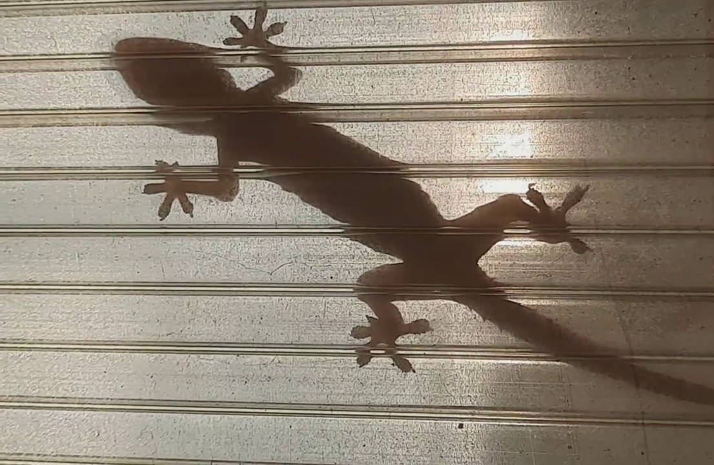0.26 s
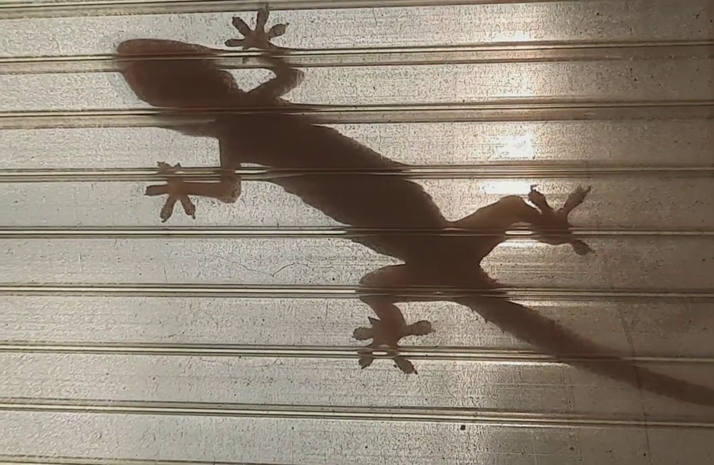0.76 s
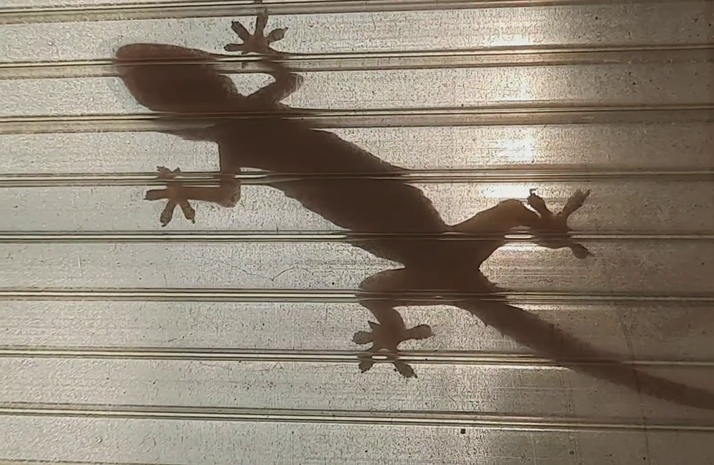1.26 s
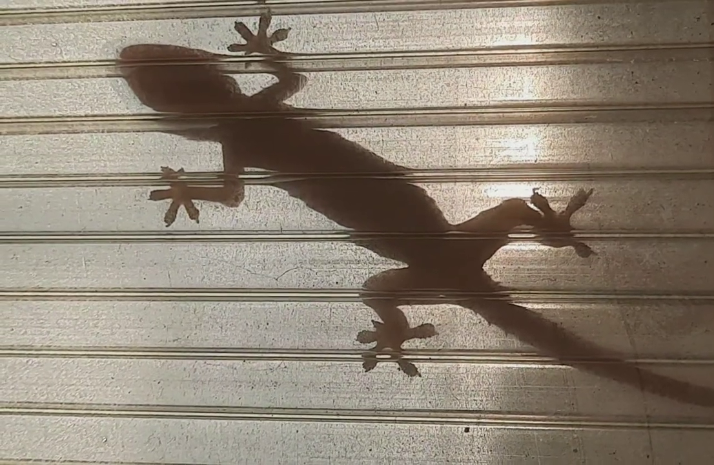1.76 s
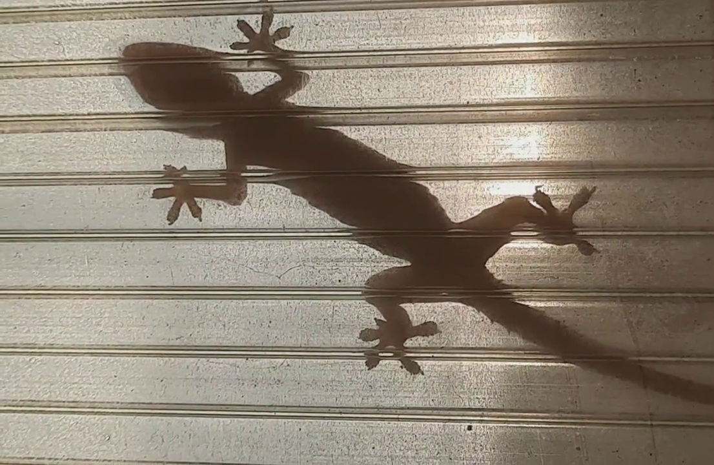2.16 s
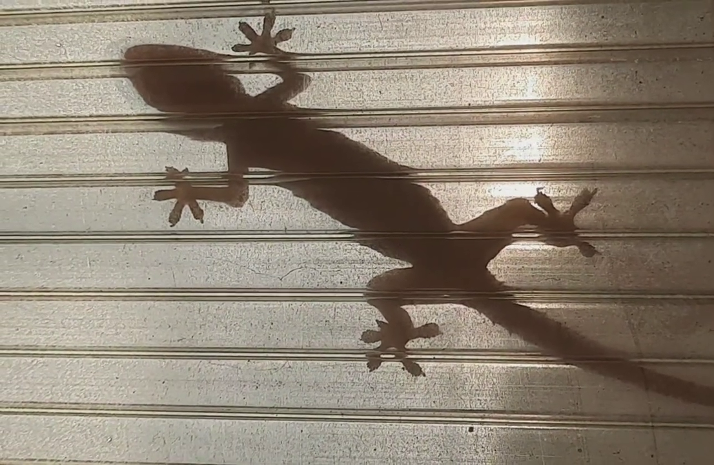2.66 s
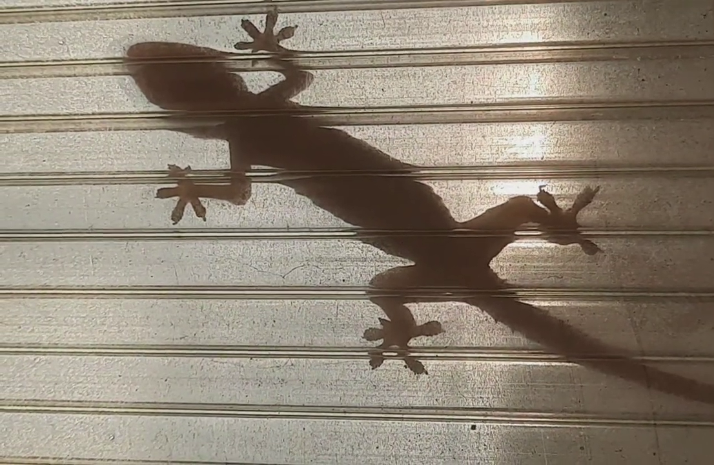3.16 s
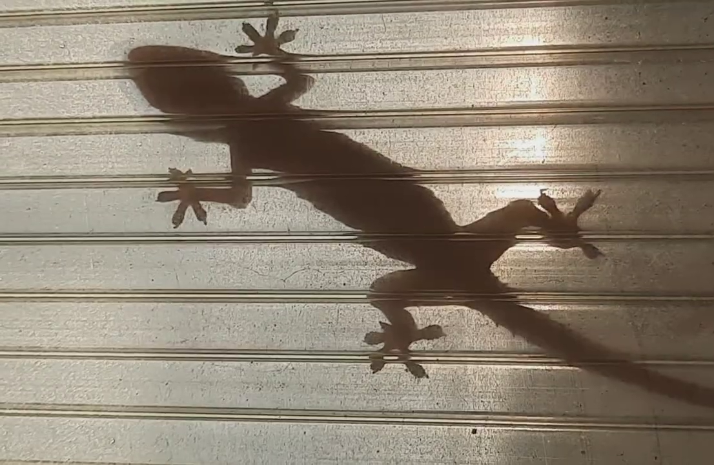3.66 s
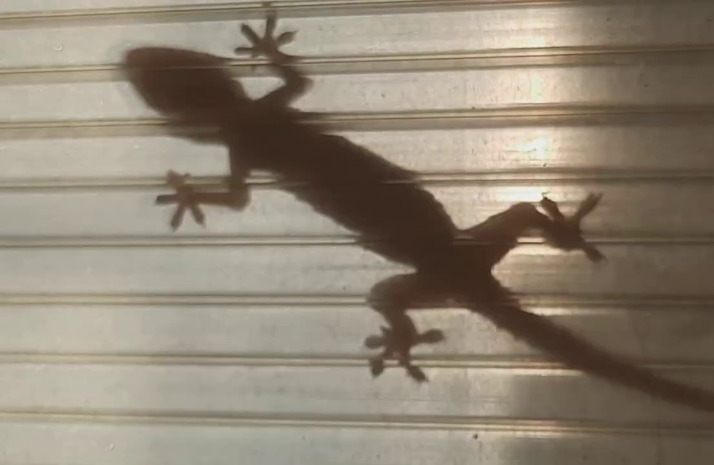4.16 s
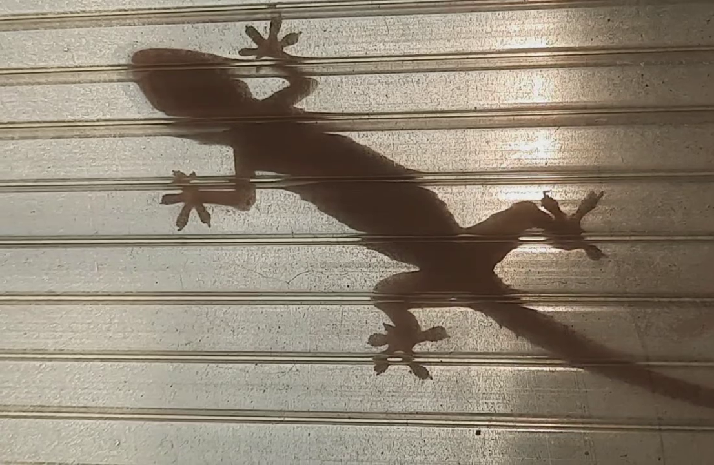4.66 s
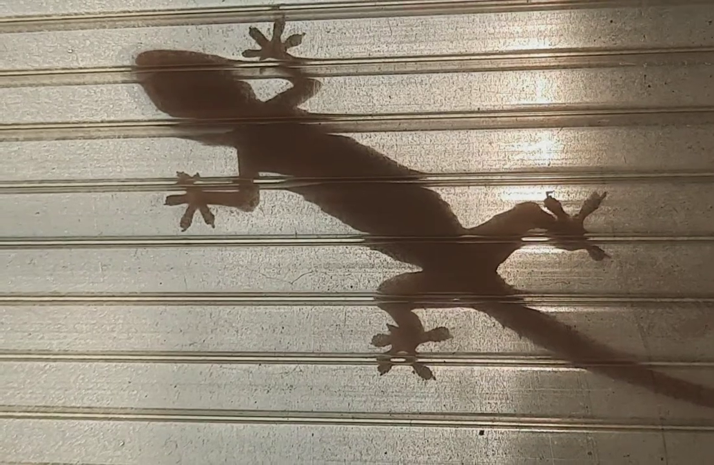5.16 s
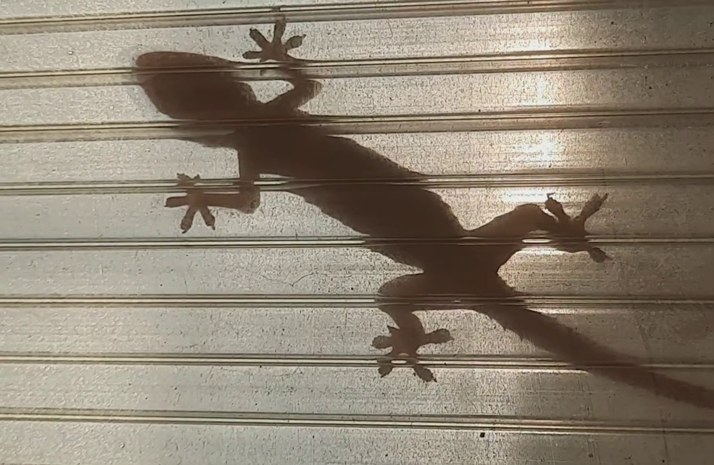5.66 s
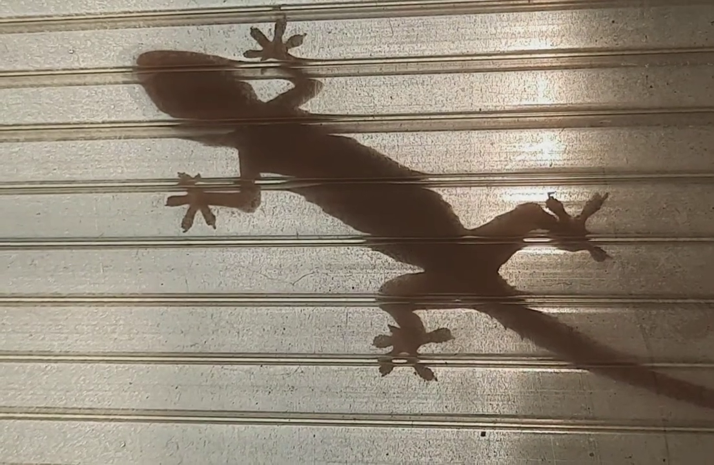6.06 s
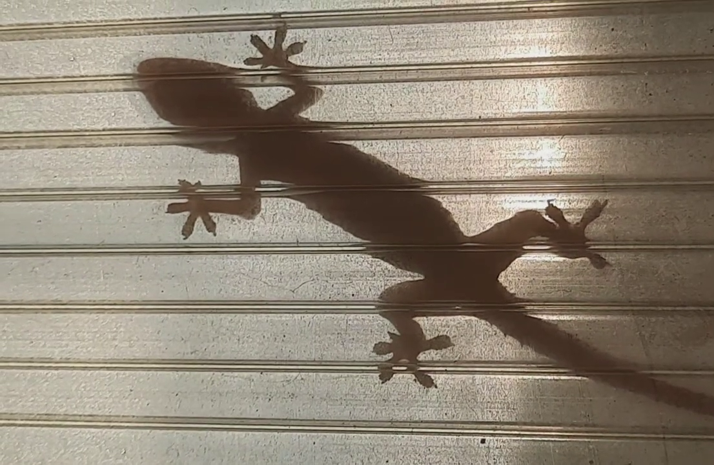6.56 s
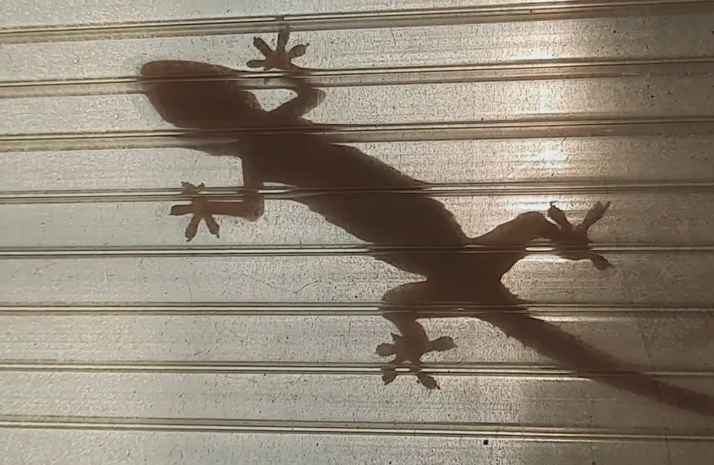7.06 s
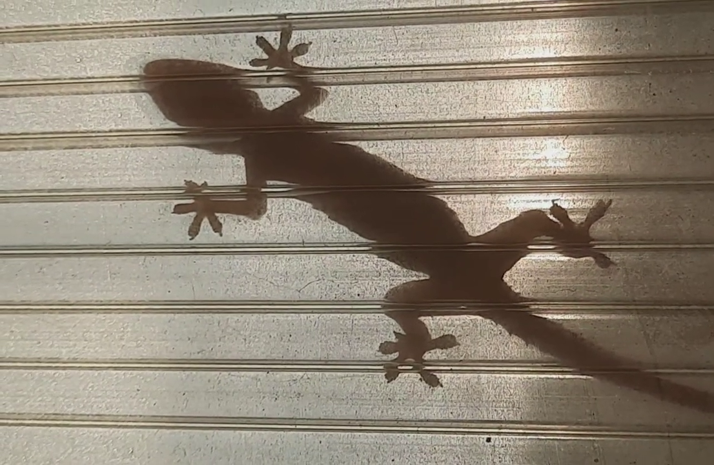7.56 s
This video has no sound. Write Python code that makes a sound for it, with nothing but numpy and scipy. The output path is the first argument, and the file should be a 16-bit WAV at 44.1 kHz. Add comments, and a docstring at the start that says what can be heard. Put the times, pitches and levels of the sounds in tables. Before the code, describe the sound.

Four high, squeaky two-part gecko calls sound close by indoors, with a low mains hum filling the pauses.

```python
"""A house gecko on a plastic roof panel gives four double chirps in a quiet room.
Each call is a short yelp that sinks into a creak, then a louder arched chirp, hoarse at first, then pure.
Both are trains of glottal pulses ringing in the throat; close echoes off the panel make the gliding
tone swell and dip. Under it lies a bed of mains hum, a distant motor, room air, a thin electrical
whine and three faint rustles."""
import sys
import numpy as np
from scipy import signal
from scipy.fft import rfft, irfft
from scipy.io import wavfile

SR = 44100
rng = np.random.default_rng(int(sys.argv[2]) if len(sys.argv) > 2 else 0)


def store_wav(level_fs):
    """Save 16-bit WAV to argv[1]."""
    pcm = np.round(np.clip(np.atleast_2d(level_fs), -1, 1) * 32767)
    wavfile.write(sys.argv[1], SR, pcm.T.astype(np.int16))


N = 344862

# odd harmonics of the mains: harmonic_number, rms_db
HUM_HARMONICS = [(1, -34.2), (3, -77.5), (5, -77), (9, -71.5), (11, -79.5), (19, -88)]
# drone of a distant motor: centre_hz, width_hz, rms_db
MOTOR_BANDS = [(253.4, 40, -64), (466, 6.9, -75), (666, 4, -83.5)]
# colour of the room air and hiss: frequency_hz, relative_db
AIR_COLOUR = [(20, 2), (45, 3), (115, 1.5), (165, -4), (240, -7), (330, -13.5), (520, -14), (690, -12),
              (780, -19), (1300, -21), (2500, -25.5), (6000, -28), (15500, -29.5)]
# path of the electrical whine: time_s, centre_hz
WHINE_PATH = [(0, 6700), (1.1, 6650), (1.6, 6770), (2.8, 6810), (3.3, 6720), (4.6, 6770), (5.6, 6680),
              (6.301, 6750), (7.2, 6650)]
# faint rustles: peak_s, half_length_s, centre_hz, peak_rms_db
RUSTLE_PUFFS = [(4.227, 0.0046, 12000, -65), (5.599, 0.0045, 4560, -65.5), (5.923, 0.021, 3494, -66.5)]
# close echoes between the ribs of the panel: delay_ms, signed_gain
RIB_ECHOES = [(0.850, .12), (1.288, .22), (1.415, -.23), (1.650, -.24)]
# EQ on the sound that the panel's frame scatters: frequency_hz, gain_db
SPLASH_EQ = [(1500, 1.5), (2500, 4.5), (3600, 7.5), (4700, -4.5), (5500, -0.5), (7000, 8), (11000, 2.5)]
# throat resonances, mouth half closed: frequency_hz, relative_db
NARROW_THROAT = [(700, -50.5), (1200, -22), (1700, -25), (2200, -13.5), (2500, -15), (2720, -9.5),
                 (2950, -13.5), (3300, -11.5), (3900, -10.5), (4500, -1), (5250, -8), (5750, -19),
                 (7000, -32.5), (8200, -36.5), (10500, -60), (13500, -67)]
# throat resonances, mouth open: frequency_hz, relative_db
OPEN_THROAT = [(700, -50.5), (1200, -27), (1750, -23), (2300, -21.5), (2700, -14), (3300, -16), (3900, -9),
               (4500, 0.5), (5250, 2), (5900, -11.5), (7000, -29), (8200, -32), (10500, -47), (13500, -67)]
# first syllables: start_s, top_hz, rise_s, fall_s, creak_s, pulse_db
YELP_CUES = [(0.0001, 2363, .0066, 0.011, 0.017, -23.5), (2.429, 2540, .011, .015, 0.024, -24.5),
             (4.9035, 2406, 0.0058, .017, 0.026, -23.5), (7.3383, 2731, .0032, 0.017, 0.026, -22)]
# lone pulses in which a creak runs out: time_s, pulse_db
CREAK_TICKS = [(0.04, -36.5), (2.483, -36), (4.9664, -32), (4.9774, -35), (7.3934, -35)]
# second syllables: start_s, hoarse_hz, hoarse_db, hoarse_roughness (0-1), hoarse_s, climb_s, drop_s,
# top_hz, end_hz, pulse_db
CHIRP_CUES = [(0.1542, 1327, -29, .08, .023, 0.031, 0.015, 2569, 2035, -18),
              (2.6011, 2038, -22, 0.12, .015, 0.0269, 0.015, 2750, 2372, -17.5),
              (5.0593, 1234, -26, 0.46, .031, 0.028, 0.0146, 2603, 2127, -17.5),
              (7.4938, 1990, -24.5, 0.14, .0188, 0.034, 0.014, 2790, 2313, -17)]

CLEAR_ROUGH = .028  # unevenness of taut vocal folds, 0-1
TIME_S, BINS_HZ = np.arange(N) / SR, np.fft.rfftfreq(N, 1 / SR)


def from_db(db):
    """Decibels to gain."""
    return 10 ** (np.asarray(db) / 20)


def unit_rms(x):
    """Scale to an rms of 1."""
    return x / np.sqrt(np.mean(x ** 2) + 1e-20)


def ramp(x, start, length, ease=1):
    """From 0 to 1: a straight line, or slowing towards its end if ease is above 1."""
    return 1 - (1 - np.clip((x - start) / length, 0, 1)) ** ease


def eq_gain(curve, hz):
    """Gain of an EQ curve, drawn on a log-frequency axis."""
    points_hz, db = np.transpose(curve)
    return from_db(np.interp(np.log(hz + 1), np.log(points_hz), db))


def coloured_noise(gain):
    """Unit-rms noise shaped by a gain for every frequency."""
    return unit_rms(irfft(rfft(rng.standard_normal(N)) * gain, N))


def noise_band(centre_hz, width_hz):
    """Unit-rms noise in one steep-sided resonance."""
    return coloured_noise(1 / (1 + (2 * (BINS_HZ - centre_hz) / width_hz) ** 2))


def clicks(times_s, db, half_taps=12):
    """Band-limited impulses, placed between samples."""
    position = np.asarray(times_s)[:, None] * SR
    taps = position.astype(int) + np.arange(1 - half_taps, half_taps + 1)
    offset = taps - position
    shape = np.sinc(offset) * np.cos(np.pi * offset / (2 * half_taps)) ** 2
    return np.bincount(np.clip(taps, 0, N - 1).ravel(), (shape * from_db(db)[:, None]).ravel(), N)


def room_air(rms_db=-57):
    """Room tone: a soft rumble with hiss on top."""
    return from_db(rms_db) * coloured_noise(eq_gain(AIR_COLOUR, BINS_HZ))


def mains_hum(mains_hz=50):
    """A steady low sine with faint odd harmonics."""
    return sum(np.sqrt(2) * from_db(db) * np.sin(2 * np.pi * harmonic * mains_hz * TIME_S)
               for harmonic, db in HUM_HARMONICS)


def motor_drone():
    """A distant motor drones in narrow bands of noise."""
    return sum(from_db(db) * noise_band(hz, width_hz) for hz, width_hz, db in MOTOR_BANDS)


def electrical_whine(width_hz=240, rms_db=-82.5):
    """A thin band of hiss whose centre wanders."""
    centre_hz = np.interp(TIME_S, *np.transpose(WHINE_PATH))
    carrier = np.sin(2 * np.pi * np.cumsum(centre_hz) / SR)
    return from_db(rms_db) * unit_rms(noise_band(0, width_hz) * carrier)


def rustles(width_hz=4000):
    """Brief soft puffs of friction noise."""
    return sum(from_db(db) * np.exp(-((TIME_S - peak_s) / half_s) ** 2) * noise_band(hz, width_hz)
               for peak_s, half_s, hz, db in RUSTLE_PUFFS)


def reverb(x, t60_s, level_db, predelay_s):
    """Dense reflections that set in after a delay and die away."""
    t = np.arange(SR // 2) / SR
    tail = rng.standard_normal(len(t)) * from_db(-60 * t / t60_s) * (t > predelay_s)
    return from_db(level_db) * signal.oaconvolve(x, tail / np.linalg.norm(tail))[:N]


def panel_and_room(voice):
    """Close echoes off the panel comb the voice; its frame adds a short splash, the room a faint tail."""
    echoes = sum(gain * np.interp(TIME_S - ms / 1000, TIME_S, voice, left=0) for ms, gain in RIB_ECHOES)
    splash_send = irfft(rfft(voice) * eq_gain(SPLASH_EQ, BINS_HZ), N)
    splash = reverb(splash_send, t60_s=.071, level_db=-20, predelay_s=.0059)
    tail = reverb(voice, t60_s=.22, level_db=-45, predelay_s=.012)
    return voice + echoes + splash + tail


def throat(pulses, resonances, skew=.34, size=2048):
    """Each pulse rings in the throat and mouth: it swells within a few cycles and dies more slowly."""
    cepstrum = irfft(np.log(eq_gain(resonances, np.fft.rfftfreq(size, 1 / SR))))
    cepstrum[1:size // 2] *= 1 + skew  # moves ringing from before the peak to after it
    cepstrum[size // 2 + 1:] *= 1 - skew
    ring = np.fft.fftshift(irfft(np.exp(rfft(cepstrum))))
    return signal.oaconvolve(pulses, ring / np.abs(ring).max(), "same")


def glottis(syllable, jitter_cycles=.11, shimmer_db=5.5, least_rough=.0072, release_s=.001, draws=512):
    """One pulse per cycle of the vocal folds; slack folds beat unevenly in time and strength."""
    flutter_share, flutter_s = .009, .002  # depth and pace of a random pitch wobble
    curve_s, pitch_hz, level_db, rough = syllable
    t = np.arange(curve_s[0], curve_s[-1] + 2 * release_s, 1 / SR)
    flutter = np.interp((t - curve_s[0]) / flutter_s, np.arange(draws), rng.standard_normal(draws))
    cycles = np.cumsum(np.interp(t, curve_s, pitch_hz) * (1 + flutter_share * flutter)) / SR
    pulse_s = np.interp(np.arange(cycles[-1]), cycles, t)
    unevenness = least_rough + np.interp(pulse_s, curve_s, rough)
    lateness, strength = rng.standard_normal((draws, 2))[:len(pulse_s)].T * unevenness
    jitter_s = jitter_cycles * lateness / np.interp(pulse_s, curve_s, pitch_hz)
    pulse_db = np.interp(pulse_s, curve_s, level_db) + shimmer_db * strength
    release_db = -10 * np.maximum(0, (pulse_s - curve_s[-1]) / release_s + .5)
    return clicks(pulse_s + jitter_s, pulse_db + release_db)


def yelp(start_s, top_hz, rise_s, fall_s, creak_s, pulse_db):
    """Curves for the glottis: the pitch scoops up, sinks and breaks as the folds slacken to a creak."""
    attack_s, attack_db, attack_rough = .003, -2.5, .26
    scoop_hz_per_s, break_hz, sag_db = 67000, 1748, 5
    slacken_s, slack_hz, taut_hz = .008, 1100, 2150
    creak_hz, creak_db, creak_db_per_s, creak_rough = 457, -30.5, -170, .5
    t = np.arange(0, rise_s + fall_s + creak_s, 1 / SR)
    attack = 1 - ramp(t, 0, attack_s)
    scoop = (1 - ramp(t, 0, rise_s)) ** 2
    sink = ramp(t, rise_s, fall_s) ** 2
    since_break_s = np.maximum(t - rise_s - fall_s, 0)
    taut = np.exp(-since_break_s / slacken_s)
    arch_hz = top_hz - scoop_hz_per_s * rise_s * scoop - (top_hz - break_hz) * sink
    pitch_hz = creak_hz + (arch_hz - creak_hz) * taut
    arch_db = pulse_db + attack_db * attack - sag_db * sink
    level_db = arch_db * taut + (creak_db + creak_db_per_s * since_break_s) * (1 - taut)
    rough = np.interp(pitch_hz, [slack_hz, taut_hz], [creak_rough, CLEAR_ROUGH]) + attack_rough * attack
    return start_s + t, pitch_hz, level_db, rough


def chirp(start_s, hoarse_hz, hoarse_db, hoarse_rough, hoarse_s, climb_s, drop_s,
          top_hz, end_hz, pulse_db):
    """Curves for the glottis: a hoarse start lifts into a loud, clear arch and closes with a rasp."""
    attack_s, attack_db, attack_rough, scoop_share = .0045, -1.5, .3, .2154
    lift_s, clearing_s, clear_hz, swell_db = .0067, .007, 2125, 2.5
    lift_push_db, drop_push_db = 4.5, 2  # a push of air as the pitch lifts, another as it drops
    close_s, close_db, close_rough, close_rise_hz = .0043, -7.5, .15, 200
    top_s = hoarse_s + climb_s
    t = np.arange(0, top_s + drop_s + close_s, 1 / SR)
    attack = 1 - ramp(t, 0, attack_s)
    lift = ramp(t, hoarse_s - lift_s, lift_s)
    clear = ramp(t, hoarse_s - clearing_s / 2, clearing_s)
    climb = ramp(t, hoarse_s, climb_s, ease=1.6)
    drop = ramp(t, top_s, drop_s, ease=1.2)
    close = ramp(t, top_s + drop_s, close_s)
    pitch_hz = hoarse_hz * (1 - scoop_share * attack) + (clear_hz - hoarse_hz) * lift
    pitch_hz += (top_hz - clear_hz) * climb + (end_hz - top_hz) * drop + close_rise_hz * close
    onset_db = hoarse_db + attack_db * attack + lift_push_db * np.sqrt(lift)
    arch_db = pulse_db - swell_db * (1 - climb + drop) + drop_push_db * np.sin(np.pi * drop)
    level_db = onset_db * (1 - clear) + (arch_db + close_db * close) * clear
    rough = hoarse_rough * (1 - clear) + CLEAR_ROUGH * clear + attack_rough * attack + close_rough * close
    return start_s + t, pitch_hz, level_db, rough


def gecko(mouth_opens_hz=1300, opening_span_hz=400):
    """Yelps sound through a half-closed mouth; in a chirp it opens as the pitch rises."""
    narrow = sum(glottis(yelp(*cue)) for cue in YELP_CUES) + clicks(*np.transpose(CREAK_TICKS))
    wide = np.zeros(N)
    for cue in CHIRP_CUES:
        syllable = chirp(*cue)
        curve_s, pitch_hz = syllable[:2]
        pulses = glottis(syllable)
        opening = ramp(np.interp(TIME_S, curve_s, pitch_hz), mouth_opens_hz, opening_span_hz)
        narrow += pulses * (1 - opening)
        wide += pulses * opening
    return throat(narrow, NARROW_THROAT) + throat(wide, OPEN_THROAT)


def scene():
    """The gecko and its reflections over the quiet bed, all dead centre."""
    calls = panel_and_room(gecko())
    mono = calls + mains_hum() + motor_drone() + room_air() + electrical_whine() + rustles()
    return np.array([mono, mono])


def record(dry, cutoff_hz=16300):
    """A steep high cut on the whole mix."""
    return signal.sosfiltfilt(signal.cheby2(16, 60, cutoff_hz, fs=SR, output="sos"), dry)


dry = scene()
out = record(dry)
store_wav(out)
```